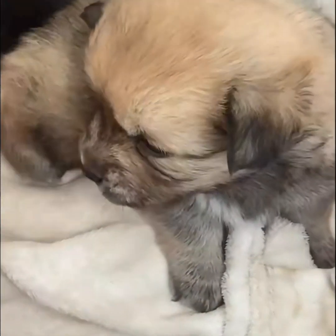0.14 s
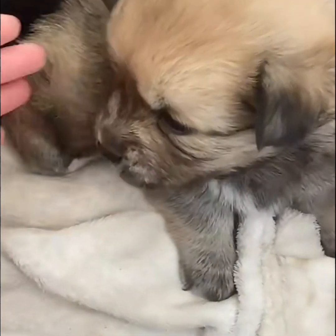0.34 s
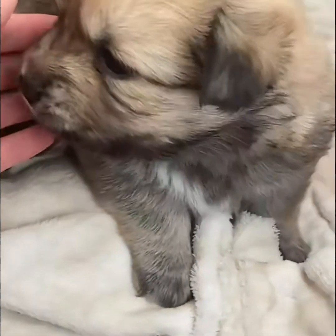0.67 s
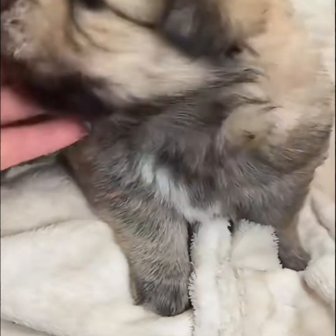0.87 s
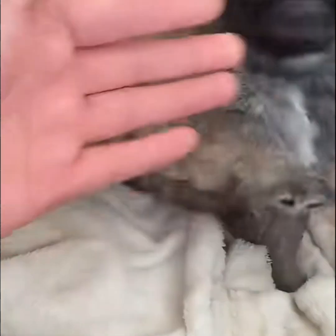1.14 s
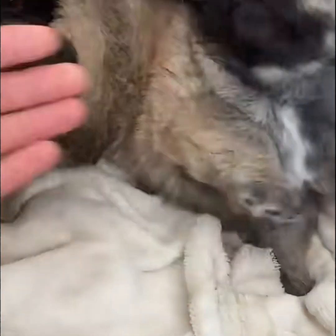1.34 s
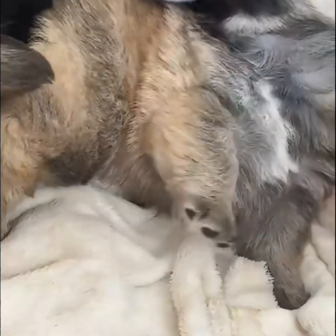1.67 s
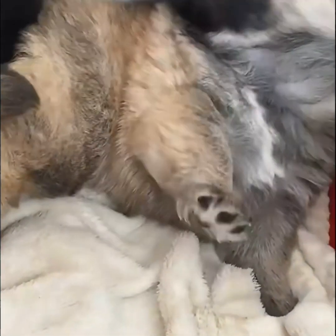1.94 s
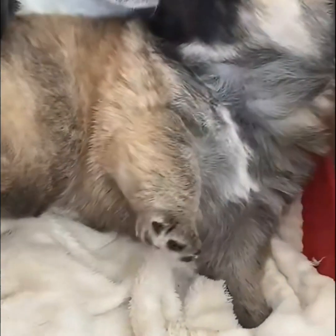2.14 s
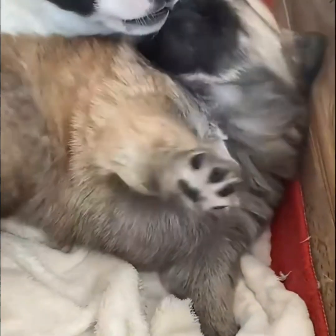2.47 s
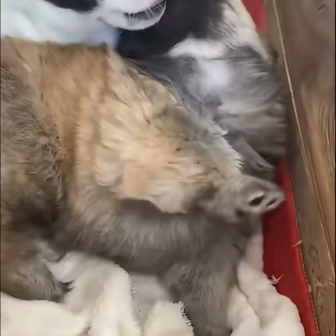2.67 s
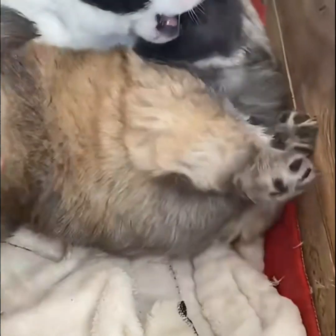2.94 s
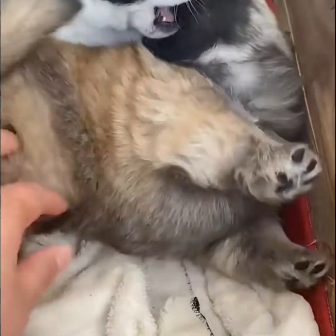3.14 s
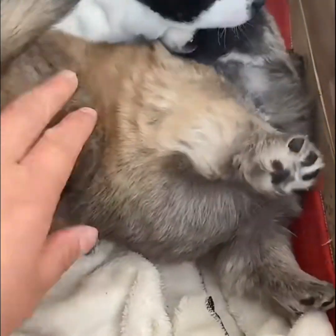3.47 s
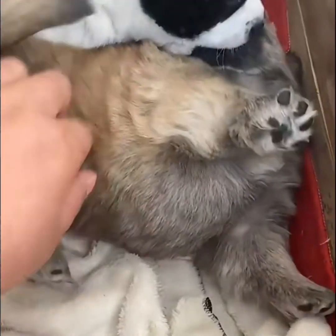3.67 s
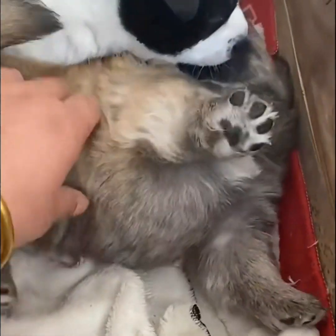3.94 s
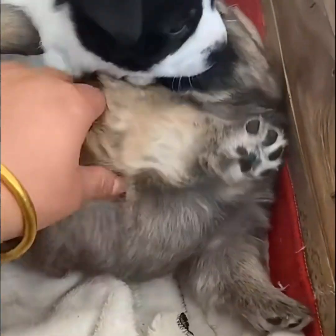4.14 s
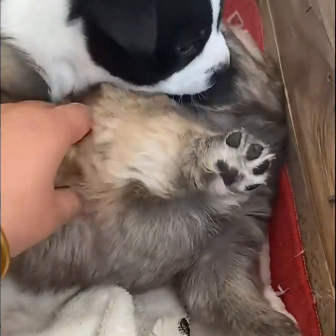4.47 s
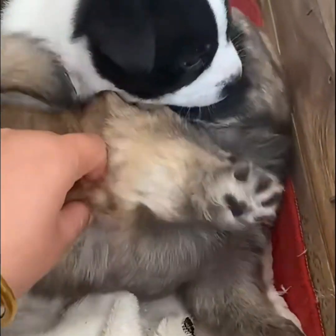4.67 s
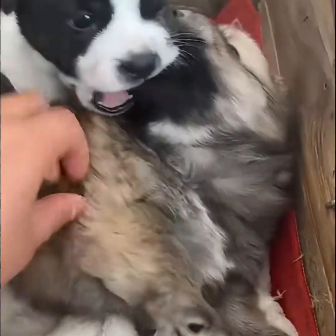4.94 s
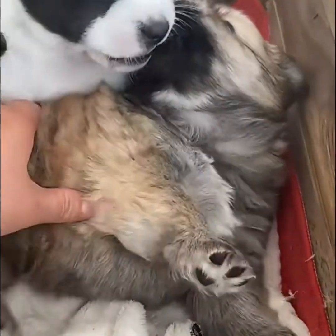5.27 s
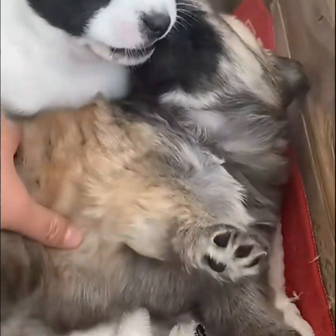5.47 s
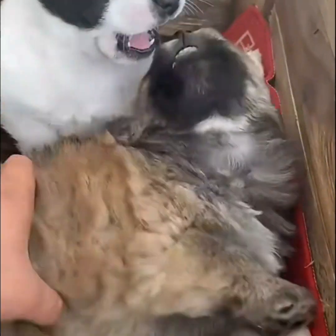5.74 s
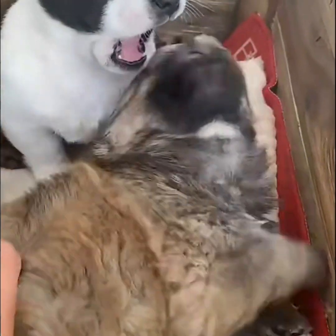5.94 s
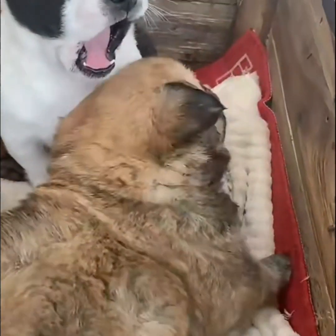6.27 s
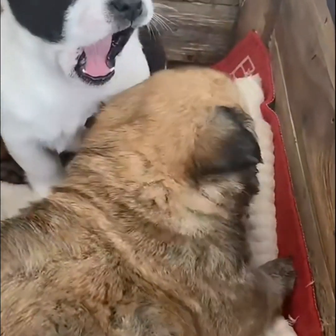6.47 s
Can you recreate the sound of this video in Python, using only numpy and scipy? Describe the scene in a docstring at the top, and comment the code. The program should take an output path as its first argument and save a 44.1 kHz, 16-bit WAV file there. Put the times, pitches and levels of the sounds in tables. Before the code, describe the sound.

Fur brushes a hand-held phone and soft bumps knock against it. Almost at once a play-fighting puppy begins a run of short, low, rough growls, two or three a second, some with a sharper, raspy push. Faint claw and mouth ticks, a few brief blanket swishes and more soft bumps fall among them. The small room rings briefly after each growl, over a quiet low rumble.

```python
"""Fur brushes past a hand-held phone and soft bumps knock its case: puppies are play-fighting on a blanket.
Claws tick, and one puppy gives a run of short, rough growls. Its vocal folds buzz on a low note
while loose tissue flutters against them; throat, mouth and muzzle shape the buzz, and breath adds rasp.
The small room rings briefly after each growl, and a low rumble lies under everything."""
import sys
import numpy as np
from scipy import signal
from scipy.fft import rfft, irfft, next_fast_len
from scipy.io import wavfile
from scipy.ndimage import uniform_filter1d, minimum_filter1d, map_coordinates

SR = 44100
rng = np.random.default_rng(int(sys.argv[2]) if len(sys.argv) > 2 else 0)


def persist_wave(psi):
    """Save psi, clipped to +-1, as 16-bit WAV."""
    counts = np.round(np.clip(psi, -1, 1) * 32767).astype(np.int16)
    wavfile.write(sys.argv[1], SR, np.atleast_2d(counts).T)


N = 290619

# tone colour of the quiet room and of the fur's hiss: (frequency [Hz], relative level [dB])
RUMBLE_COLOUR = [(25, -23), (40, -18), (60, 0), (80, -7), (122, 0), (170, -2), (260, -13), (500, -17),
                 (1000, -31), (2400, -39), (4000, -49), (15000, -62)]
FUR_COLOUR = [(500, -39), (1000, -10), (2500, -5), (4000, -13.5), (7000, -10.5), (10500, -14.5),
              (15000, -30)]
# how alike left and right are in sound from all around: (frequency [Hz], likeness [0-1])
STEREO_LIKENESS = [(220, .99), (500, .85), (1500, .55), (3000, .2), (10000, .1)]
# fur brushing past: (time [s], hiss level [dB], relative rubbing level [dB])
BRUSHES = [(0.0, -55.5, -61), (0.116, -52.5, -12.5), (0.17, -69, -23), (0.188, -44.5, -15),
           (0.224, -46, -17), (0.242, -71.5, -18.5), (0.308, -40.5, -12.5), (0.368, -58, -27.5),
           (0.391, -53, -24)]
# fur sliding on the blanket: (time [s], half length [s], level [dB])
BLANKET_SWISHES = [(1.376, 0.011, -29.5), (2.942, 0.21, -60.5), (3.114, 0.048, -29), (6.101, 0.055, -40.5)]
# soft bumps on the phone: (time [s], relative ring level [dB], relative thud level [dB])
PHONE_BUMPS = [(0.031, -22, -72), (0.099, -46, -22), (0.111, -20, -45), (0.138, -28, -34),
               (0.19, -14.5, -32), (0.217, -8, -26), (0.236, -19.5, -33), (0.278, -27, -35),
               (0.296, -18, -38), (0.312, -14.5, -43), (0.335, -22, -24), (0.395, -20, -34),
               (0.418, -23, -30), (0.61, -11, -27.5), (0.632, -24, -34), (0.705, -21.5, -36.5),
               (1.881, -6.5, -26.5), (1.915, -9.5, -23.5), (1.949, -6, -27), (1.985, -8.5, -27),
               (2.854, -25.5, -48), (2.999, -25, -41)]
# stretches when the grip on the phone shifts: (start [s], end [s])
GRIP_SHIFTS = [(.56, .74), (2.779, 3.6)]
# the hollow ring of the phone's case: (frequency [Hz], width [Hz], relative level [dB])
CASE_RESONANCES = [(507, 132, 0), (611, 122, -8.5), (414, 99, -3.5)]
# claw and mouth ticks: (time [s], relative bright level [dB], relative dull level [dB])
CLAW_AND_MOUTH_TICKS = [(0.187, -30, -27.5), (0.9878, -45, -14), (1.021, -43, -14), (1.211, -16, -18),
                        (1.3592, -26.5, -20), (1.3821, -30, -21.5), (1.8426, -26, -42.5),
                        (1.8777, -23, -38), (2.206, -40.5, -39), (2.5502, -26.5, -27.5),
                        (2.5743, -33.5, -39.5), (3.2699, -38.5, -20.5), (3.3076, -36.5, -23),
                        (3.3278, -44, -23), (3.349, -36.5, -38), (3.743, -44, -30.5), (3.7676, -28, -24),
                        (3.788, -37.5, -27), (5.4953, -42, -34.5)]
# one growl a row: (start [s], hold [s], release [s], base pitch [Hz], glide over the hold [Hz],
# chest tone [dB], throat [dB], mouth [dB], muzzle [dB], snarl [dB], rasp [dB],
# brightening over the hold [dB], octave against the chest tone [dB], roughness [0-1],
# flutter depth [0-1], snarl resonance [Hz], throat resonance shift [%], mouth resonance shift [%])
PUPPY_GROWLS = [ (0.388, 0.19, 0.038, 127.1, -14.5, -25.5, -34, -50, -55.5, -64, -59, -9, 0.5, 0.65, 0.28, 3220, -17, 1),
                (0.754, .14, 0.075, 176.1, -10, -15.5, -32, -25.5, -32.5, -65.5, -48.5, -2, -18, 0.31, 0.26, 3800, -1, 6.5),
                (1.083, .19, 0.13, 202.1, 42, -13, -20, -27.5, -29.5, -50, -40, -1.5, -19, 0.46, 0.17, 3630, 8, 5),
                (1.489, 0.23, 0.064, 204.5, -15.5, -12.5, -22, -32.5, -31.5, -42.5, -49, -16.5, -20, 0.54, .38, 3560, 3, -2.5),
                (1.897, 0.12, 0.087, 187.1, -5, -17.5, -25, -42, -47.5, -68, -51, -3, -14.5, 0.72, 0.35, 4360, 0, -2.5),
                (2.309, 0.14, 0.053, 183.4, 24.5, -15, -22.5, -39, -46, -41.5, -50, 1, -13.5, 0.88, 0.32, 2640, 0.5, 1),
                (2.617, 0.082, 0.059, 179.1, -2, -17, -23.5, -44.5, -42, -59, -59.5, -1, -12.5, 0.73, .3, 3240, -6, 0),
                (3.018, 0.16, 0.086, 201.8, -23, -15.5, -22, -40, -42.5, -54.5, -48.5, 6.5, -12.5, 0.55, 0.22, 3500, -4.5, 1.5),
                (3.387, 0.24, 0.096, 194.9, -9, -14, -21.5, -29, -31, -52, -47.5, -2.5, -10.5, 0.27, 0.34, 3100, -2.5, 1),
                (3.785, .04, 0.018, 150.5, -6.5, -27.5, -29.5, -30, -49, -49, -55, 2, -3, 0.58, 0.21, 3560, 10, -2.5),
                (3.856, .295, 0.056, 216.2, -11.5, -15, -17.5, -27, -27, -42.5, -42.5, 3, -13, 0.48, 0.2, 3700, 3, 2.5),
                (4.36, .15, .11, 209.8, 1.5, -15.5, -16.5, -31, -31, -37.5, -40, 3, -10.5, 0.65, .18, 3220, -0.5, 0.5),
                (4.703, .13, 0.14, 236.9, -8, -15, -16, -20, -20.5, -30.5, -37, -3.5, -21, 0.37, 0.13, 4030, 2, -2.5),
                (5.071, 0.19, 0.086, 190.3, -5, -16.5, -21.5, -41.5, -38.5, -75, -49.5, -5, -9.5, 0.96, 0.35, 4400, 4.5, 0.5),
                (5.544, 0.19, 0.064, 205.5, 3, -14.5, -15.5, -29, -28, -67.5, -48.5, 3, -11, 0.65, 0.1, 3400, 0.5, 1),
                (5.925, .11, 0.12, 188.3, -22, -17.5, -19, -31, -38, -53, -42.5, 9, -8.5, 0.37, 0.35, 3130, 9, -1.5),
                (6.322, 0.17, 0.076, 168.8, -10, -21.5, -29.5, -43.5, -43.5, -85, -59.5, 2, -9.5, 0.42, 0.27, 4020, -16, -1.5)]
# hard pushes within a growl:
# (time [s], half length [s], pitch lift [Hz], mouth lift [dB], muzzle lift [dB], snarl lift [dB])
HARD_PUSHES = [(0.546, 0.029, 1.2, 14.5, 19, -13), (1.1, 0.016, 2, 8, 9, 4),
               (1.235, .034, 23.6, 10, 15.5, -16), (1.684, 0.044, 3.3, 7.5, 9, -1.5),
               (2.663, 0.016, 5.75, 14.5, 12, 15), (3.13, 0.034, 1.5, -3, 0, 18.5),
               (3.579, 0.017, 5, 3.5, 5.5, 9.5), (3.894, 0.039, 25.4, 11.5, 2.5, 0),
               (4.115, 0.031, 26.1, 5.5, 4.5, 10), (4.473, 0.019, 3.5, 1.5, 3.5, 6),
               (4.775, 0.032, 31.3, 9, 5.5, 0.5), (5.693, 0.04, 4.36, 1, 10, 26.5),
               (5.956, 0.019, 2.94, 10.5, 3, 19)]
# where the puppy's airway rings: (frequency [Hz], width [Hz], relative level [dB])
THROAT_RESONANCES = [(483, 356, 2), (780, 193, 1), (926, 250, 1.5)]
MOUTH_RESONANCES = [(1599, 294, 12.4), (1936, 167, 11.1)]
MUZZLE_RESONANCES = [(2140, 43, 0.7), (2313, 310, -1)]
LIPS_BACK_RESONANCES = [(2188, 200, -0.19), (2517, 330, -0.76)]
RASP_RESONANCES = [(5503, 360, 1), (5870, 330, -2.5), (6760, 630, -9), (7750, 630, -10.5),
                   (9420, 1340, -9.5), (12600, 3500, -25.5)]
# how much louder the puppy is at the left microphone: (frequency [Hz], left minus right [dB])
LEFT_LOUDER = [(200, .4), (550, .3), (850, 3.3), (1200, -1), (1800, -1), (2400, -4), (3500, -1),
               (10000, -.2)]
# how far ahead its wave is at the left microphone: (frequency [Hz], phase lead [radians])
LEFT_AHEAD = [(250, -.1), (400, -.55), (600, -.2), (800, -.8), (1080, -.9), (1400, 0), (2500, .1),
              (2750, -1.1), (3100, -2.5), (3400, 0), (4100, 1.5), (4400, 1.2), (4750, 3), (5100, 3),
              (5350, 0), (6000, .3), (9500, 2.2), (10500, .7)]
# how long the room rings: (frequency [Hz], time to fade by 60 dB [s])
ROOM_FADE = [(150, 0.61), (400, 0.37), (2000, 0.57), (6000, 0.63), (14000, 0.1)]
# how strongly the room rings: (frequency [Hz], level [dB])
ROOM_LEVEL = [(110, -4), (220, -6.5), (800, -7), (2400, -9.5), (6000, -6.5), (14000, 6)]
# standing waves between the walls: (frequency [Hz], width [Hz], level [dB])
STANDING_WAVES = [(172, 41, -20.5), (117, 9.7, -20), (435, 47, -5)]

ATTACK_S, CHEST_ATTACK_S = 0.018, 0.027  # the rasp starts quickly, the chest tone builds behind it
RELEASE_DB, CHEST_RELEASE_DB = 37, 13.5  # fall over the release
ARCH_DB, ARCH_HZ = 1, 16  # level and pitch are lower by this at both ends of the hold
SAG_HZ = 36.3  # the pitch sinks as the push runs out


def amp(db):
    """Turn decibels into a number to multiply by."""
    return 10 ** (np.asarray(db) / 20)


def unit(x):
    """Scale a sound to an average (rms) level of 1."""
    return x / np.sqrt(np.mean(x ** 2) + 1e-20)


def along(points, hz):
    """Read between the rows of a (frequency, value) table, on a log scale."""
    freqs, values = np.transpose(points)
    return np.interp(np.log(hz + 1), np.log(freqs + 1), values)


def wobble(rate, size):
    """A smooth curve through `rate` random values a second."""
    return map_coordinates(rng.standard_normal(2048), [np.arange(size) * rate / SR], mode="mirror")


def filtered(x, response):
    """Change the level and phase of each frequency in x by response(hz)."""
    size = x.shape[-1]
    padded = next_fast_len(size + 8192)
    return irfft(rfft(x, padded) * response(np.fft.rfftfreq(padded, 1 / SR)), padded)[..., :size]


def resonate(x, modes):
    """Ring x through resonances: steep-sided bands that let their own frequencies pass."""
    def response(f):
        return sum((-1) ** k * amp(db) * (1j * f * width / (hz * hz - f * f + 1j * f * width)) ** 2
                   for k, (hz, width, db) in enumerate(modes))
    return filtered(x, response)


def shifted(modes, percent):
    """The same resonances, all moved up or down."""
    return [(hz * (1 + percent / 100), width, db) for hz, width, db in modes]


def add(track, start_s, sound):
    """Mix a sound into the track at its start time."""
    part = track[max(round(start_s * SR), 0):][:len(sound)]
    part += sound[:len(part)]


def stereo_noise(size):
    """White noise whose two sides are alike in the bass and nearly unrelated in the treble."""
    def spread(hz):
        angle = np.arccos(np.clip(along(STEREO_LIKENESS, hz), -1, 1)) / 2
        return np.array([np.cos(angle), np.sin(angle)])
    mid, side = filtered(rng.standard_normal((2, size)), spread)
    return np.array([mid + side, mid - side])


def rumble(level_db=-37):
    """The quiet room: low noise whose level wanders slowly."""
    level = amp(level_db + 0.6 * wobble(2.79, N))
    return level * unit(filtered(stereo_noise(N), lambda hz: amp(along(RUMBLE_COLOUR, hz))))


def fur(rub_trim_db=-10):
    """Fur brushes by with a grainy hiss; the first strokes also rub dully through the phone's case."""
    times, *levels = np.transpose(BRUSHES)
    t = np.arange(N) / SR
    hiss_db, rub_db = [np.interp(t, times, db, right=-120) for db in levels]
    swishes = sum(amp(db) * np.exp(-((t - at) / half) ** 2) for at, half, db in BLANKET_SWISHES)
    stroke = (amp(hiss_db) + swishes) * amp(2.6 * wobble(130, N))
    hiss = unit(filtered(stereo_noise(N), lambda hz: amp(along(FUR_COLOUR, hz))))
    rub = unit(resonate(rng.standard_normal(N), [(83.0, 77, 1.5), (298, 270, -15.0), (551, 82, -2)]))
    return stroke * hiss + amp(rub_db + rub_trim_db + 2.4 * wobble(70, N)) * rub


def bumps(thud_hz=95, glide_hz=420, glide_s=0.00555, fade_s=0.089):
    """Each bump rings the phone's case; its thud sinks in pitch as the soft contact spreads."""
    track, t = np.zeros(N), np.arange(SR // 8) / SR
    for start, ring_db, thud_db in PHONE_BUMPS + grip_bumps():
        stiffness = 1 + .03 * rng.normal()
        modes = [(hz * stiffness, width, db) for hz, width, db in CASE_RESONANCES]
        ring = resonate(signal.unit_impulse(len(t)), modes)
        pitch = stiffness * (thud_hz + glide_hz * np.exp(-t / glide_s))
        rise_and_fade = (1 - np.exp(-t / 0.0012)) * amp(-60 * t / fade_s)
        thud = np.sin(2 * np.pi * np.cumsum(pitch) / SR) * rise_and_fade
        add(track, start, amp(ring_db + 1.5) * ring / np.abs(ring).max() + amp(thud_db + 12.5) * thud)
    return track


def ticks(fade_s=.022):
    """Claws and mouths make tiny dry snaps, each with a bright and a duller part."""
    track, t = np.zeros(N), np.arange(SR // 20) / SR
    for start, bright_db, dull_db in CLAW_AND_MOUTH_TICKS:
        snap = rng.standard_normal(len(t)) * amp(-60 * t / fade_s)
        bright = unit(resonate(snap, [(6050, 3700, 34), (10500, 4300, -32)]))
        dull = unit(resonate(snap, [(1980, 1310, 0)]))
        add(track, start, amp(bright_db - 26) * bright + amp(dull_db - 17.5) * dull)
    return track


def room(x, boards_db=-11, boards_fade_s=0.12, delay_samples=300):
    """Nearby boards scatter the treble at once; the room's ring follows and dies band by band."""
    hz, t, bands = signal.stft(stereo_noise(SR * 3 // 4), SR, nperseg=256)
    fade_s = along(ROOM_FADE, hz)[:, None]
    # a longer ring starts softer, so its length does not add energy
    gain = amp(along(ROOM_LEVEL, hz))[:, None] * np.sqrt(2 * np.log(1000) / (fade_s * SR))
    tail = signal.istft(bands * gain * amp(-60 * t / fade_s), SR, nperseg=256)[1]
    size = tail.shape[1]
    early = rng.standard_normal(tail.shape) * amp(-60 * np.arange(size) / SR / boards_fade_s)
    early = filtered(early / np.linalg.norm(early[0]), lambda f: 1j * f / (1500 + 1j * f))  # bass cut
    echoes = np.pad(tail, ((0, 0), (delay_samples, 0)))[:, :size] + amp(boards_db) * early
    return signal.fftconvolve(x[None], echoes, axes=1)[:, :N]


def growl_shape(row, t, rasp_share=0.45):
    """A growl rises, holds and fades, with pushes on top: gives pitch [Hz] and six levels [dB]."""
    start, hold, release, base_hz, glide, chest, throat, mouth, muzzle, snarl, rasp, brighten = row[:12]
    across = np.clip((t - start) / hold, 0, 1) - .5  # -0.5 to 0.5 over the hold
    arch = (2 * across) ** 2
    spent = np.maximum(t - start - hold, 0) / release  # 0 to 1 over the release
    onset_db = lambda attack: 20 * np.log10(np.clip((t - start) / attack, 1e-3, 1))
    lift_hz, mouth_lift, muzzle_lift, snarl_lift = sum(
        np.outer(lifts, np.exp(-((t - at) / half) ** 4)) for at, half, *lifts in HARD_PUSHES)
    effort = onset_db(ATTACK_S) - ARCH_DB * arch - RELEASE_DB * spent
    bright = effort + brighten * across
    return (base_hz + glide * across + ARCH_HZ * (.5 - arch) - SAG_HZ * spent + lift_hz,
            chest + onset_db(CHEST_ATTACK_S) - ARCH_DB * arch - CHEST_RELEASE_DB * spent,
            throat + effort,
            mouth + bright + mouth_lift,
            muzzle + bright + muzzle_lift,
            snarl + bright + snarl_lift,
            rasp + bright + rasp_share * muzzle_lift)


def vocal_folds(cycles, rough, scatter_db=5.5, puff_db=7, noise_share=0.83):
    """Each time the vocal folds close, they give a pulse of uneven size and a puff of rushing air."""
    closures = np.flatnonzero(np.diff(np.floor(cycles)) > 0)
    pulses = np.zeros(len(cycles))
    pulses[closures] = amp(scatter_db * rough[closures] * rng.standard_normal(256)[:len(closures)])
    puffs = rng.standard_normal(len(cycles)) * amp(puff_db * np.cos(2 * np.pi * cycles))
    share = np.clip(noise_share * rough, 0, 1)
    return np.sqrt(1 - share) * unit(pulses) + np.sqrt(share) * unit(puffs)


def breath(cycles, modes, fall, wander, puff_db=4):
    """Air hisses once a cycle through resonances that wander, and sink as the jaw closes."""
    size = len(cycles)
    speed = np.exp(np.linspace(fall, -fall, size) + wander * wobble(16, size))
    hiss = resonate(rng.standard_normal(2 * size), modes)
    hiss = map_coordinates(hiss, [np.cumsum(speed)], mode="mirror")  # read slower, it sounds lower
    return unit(hiss * amp(puff_db * np.cos(2 * np.pi * cycles) + 2.64 * wobble(48.6, size)))


def growl(row, flutter_hz=25.286, jitter=.085, drag=0.29, lips_back_db=-23, undertone_db=-25,
          snarl_width_hz=550):
    """One growl: the vocal folds buzz at the pitch while loose tissue flutters against them."""
    start, hold, release, *_ = row
    brighten_db, octave_db, rough, flutter, snarl_hz, throat_shift, mouth_shift = row[11:]
    t = np.arange(start, start + hold + release, 1 / SR)
    size = len(t)
    pitch, chest_db, throat_db, mouth_db, muzzle_db, snarl_db, rasp_db = growl_shape(row, t)
    # a hard push steadies the folds, draws the lips back and lifts the muzzle's resonances
    lips_back = .5 + .5 * np.tanh((muzzle_db - lips_back_db) / 4)
    rough = rough * (1 - lips_back / 2)
    # each flap of the tissue chokes the tone briefly and drags on its pitch
    flap = -flutter * np.cos(2 * np.pi * np.cumsum(flutter_hz * (1 + .06 * wobble(20, size))) / SR)
    choke = unit(1 - flap - 2 * flap ** 2)
    cycles = np.cumsum(pitch * (1 - drag * flap + jitter * rough * wobble(170, size))) / SR
    tone = np.cos(2 * np.pi * cycles)
    tone += amp(octave_db + 5.1 * wobble(87.7, size)) * np.sin(4 * np.pi * cycles)
    # every other closure is weaker, which adds a faint tone an octave below
    tone += amp(undertone_db + 3.4 * wobble(40, size)) * np.cos(np.pi * cycles)
    voice = amp(chest_db) * np.sqrt(2) * tone * choke
    buzz = vocal_folds(cycles, rough) * amp(wobble(51.0, size) - 2 * flap)
    ring = lambda modes, shift: unit(resonate(buzz, shifted(modes, shift)))
    voice += amp(throat_db) * ring(THROAT_RESONANCES, throat_shift)
    voice += amp(mouth_db) * ring(MOUTH_RESONANCES, mouth_shift)
    relaxed = np.sqrt(1 - lips_back) * ring(MUZZLE_RESONANCES, mouth_shift)
    bared = np.sqrt(lips_back) * ring(LIPS_BACK_RESONANCES, mouth_shift)
    voice += amp(muzzle_db) * unit(relaxed + bared)
    # in a growl that dims the jaw closes, and the snarl resonance sinks
    jaw_fall = np.clip(-.02 * brighten_db, -.15, .15)
    snarl = breath(cycles, [(snarl_hz, snarl_width_hz, 0)], fall=jaw_fall, wander=0.041)
    rasp = breath(cycles, shifted(RASP_RESONANCES, mouth_shift / 2), fall=0.00615, wander=0.012)
    voice += amp(snarl_db) * snarl + amp(rasp_db) * rasp
    return voice * np.minimum((t[-1] - t) / .015, 1)  # a short fade avoids a click


def puppy():
    """The run of growls, a little different in level and phase at the phone's two microphones."""
    track = np.zeros(N)
    for row in PUPPY_GROWLS:
        add(track, row[0], growl(row))
    left = lambda hz: amp(along(LEFT_LOUDER, hz) / 2) * np.exp(1j * along(LEFT_AHEAD, hz) / 2)
    return filtered(track, lambda hz: np.array([left(hz), 1 / left(hz)]))


def grip_bumps(gap_s=0.021, ring_db=-43, thud_db=-48):
    """The shifting grip makes faint bumps at uneven moments: extra rows for bumps()."""
    times = np.concatenate([np.arange(start, end, gap_s) for start, end in GRIP_SHIFTS])
    return [(at + gap_s * late / 2, ring_db + 4 * force, thud_db + 4 * force)
            for at, (late, force) in zip(times, rng.uniform(-1, 1, (64, 2)))]


def scene():
    """Growls and ticks sound into the room; bumps and fur are right at the phone."""
    direct = puppy() + ticks()
    mono = direct.mean(axis=0)
    return direct + room(mono) + resonate(mono, STANDING_WAVES) + bumps() + fur() + rumble()


def record(dry, top_hz=15700):
    """The phone turns down peaks that would pass full scale and cuts off the highest treble."""
    needed = 1 / np.maximum(np.abs(dry).max(axis=0), 1)
    gain = uniform_filter1d(minimum_filter1d(needed, size=256), size=256)
    return filtered(dry * gain, lambda hz: hz < top_hz)


dry = scene()
out = record(dry)
persist_wave(out)
```